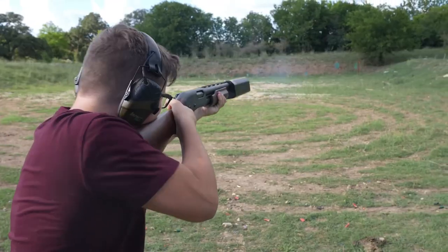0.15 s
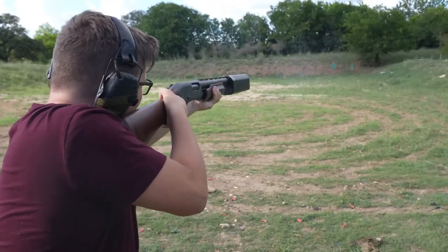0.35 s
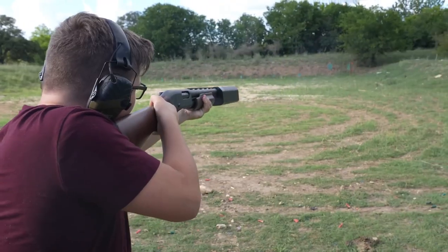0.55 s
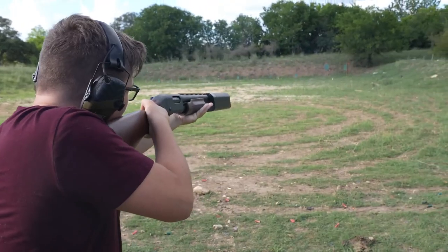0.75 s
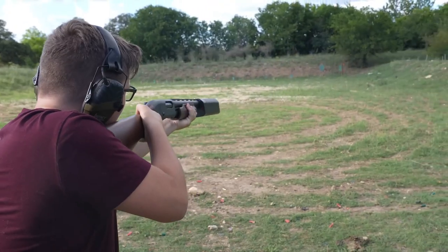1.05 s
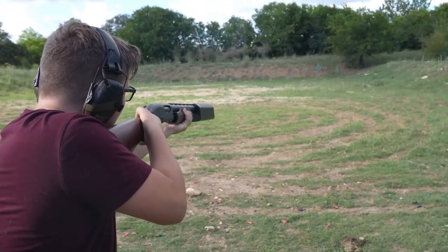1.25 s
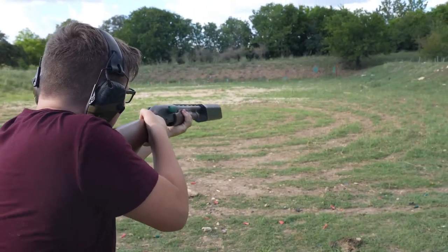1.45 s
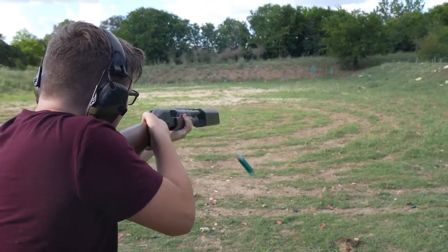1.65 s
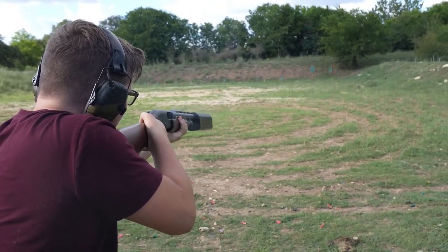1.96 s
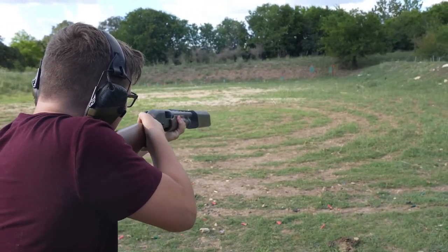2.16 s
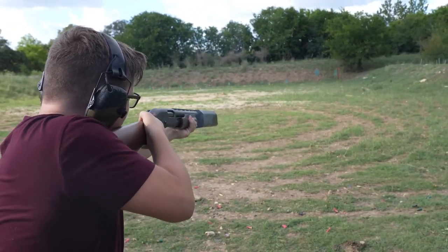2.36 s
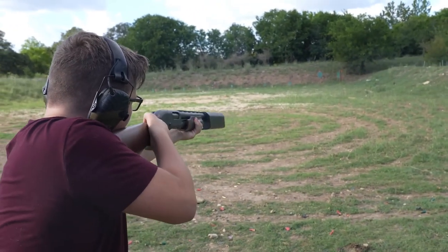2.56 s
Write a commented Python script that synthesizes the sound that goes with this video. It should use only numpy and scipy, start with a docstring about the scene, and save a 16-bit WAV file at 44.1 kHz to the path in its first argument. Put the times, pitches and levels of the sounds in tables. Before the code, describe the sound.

A suppressed shotgun fires once with a short spit, and a hissing echo rolls off the field and trees. Then the pump clacks back and slams shut, close to the microphone, over faint wind and insects.

```python
"""A suppressed pump shotgun fires once on a grassy range, heard from just behind the shooter.
Gas spits from the muzzle. The field scatters the shot back as a long hiss, and the bank and trees echo.
Then the pump is pulled back and slammed shut, and its steel parts clack, scrape and ring.
Underneath are light wind on the microphone, a faint steady hiss and insects in the grass."""
import sys
import numpy as np
from scipy import signal
from scipy.fft import rfft, irfft, next_fast_len
from scipy.io import wavfile
from scipy.ndimage import map_coordinates

SR = 44100
rng = np.random.default_rng(int(sys.argv[2]) if len(sys.argv) > 2 else 0)


def to_wav(s):
    """Save 16-bit WAV."""
    ch = np.atleast_2d(s).T  # columns
    pcm = np.round(np.clip(ch, -1, 1) * 32767)  # PCM
    wavfile.write(sys.argv[1], SR, pcm.astype(np.int16))


N = 119070
TIME_S = np.arange(N) / SR
LEFT_RIGHT = np.array([[1], [-1]])


def amp(db):
    """Turn decibels into a gain."""
    return 10 ** (np.asarray(db) / 20)


def unit(x):
    """Scale x to an average power of 1."""
    return x / np.sqrt(np.mean(x ** 2) + 1e-20)


def along(points, hz):
    """Read between (pitch_hz, value) points on a log pitch scale."""
    pitches, values = np.transpose(points)
    return np.interp(np.log(hz + 1), np.log(pitches + 1), values)


def tone(points):
    """Turn (pitch_hz, level_db) points into a gain curve."""
    return lambda hz: amp(along(points, hz))


def filtered(x, response):
    """Multiply each frequency in x by response(hz)."""
    size = next_fast_len(N + SR // 4)
    return irfft(rfft(x, size) * response(np.fft.rfftfreq(size, 1 / SR)), size)[..., :N]


def panned(db):
    """Left and right gains, with the left louder by db."""
    return unit(amp(LEFT_RIGHT * db / 2))


def aside(x, db, corner_hz=600):
    """Move a sound to one side; its bass stays in the middle."""
    return filtered(x, lambda hz: amp(LEFT_RIGHT * db / 2 * hz ** 2 / (hz ** 2 + corner_hz ** 2)))


def noise(colour, alike):
    """Stereo noise shaped by a gain curve. alike lists (pitch_hz, likeness); 1 makes both sides equal."""
    def response(hz):
        angle = np.arccos(np.clip(along(alike, hz), -1, 1)) / 2
        return colour(hz) * np.array([np.cos(angle), np.sin(angle)])
    mid, side = filtered(rng.standard_normal((2, N)), response)
    return unit(np.array([mid + side, mid - side]))


def split(x, edges, order=12):
    """Cut x into neighbouring pitch bands of equal power."""
    def band(low, high):
        return lambda hz: ((1 + (low / (hz + 1)) ** order) * (1 + (hz / high) ** order)) ** -.5
    return np.array([unit(filtered(x, band(low, high))) for low, high in zip(edges, edges[1:])])


def wobble(per_s):
    """A smooth curve through per_s random values a second."""
    return map_coordinates(rng.standard_normal(8192), [TIME_S * per_s], mode='wrap')


def fading(x, fades, start_s):
    """Fade each pitch at its own speed. In all tables, fade_s is the time to fall by 60 dB."""
    hz, t, spectrum = signal.stft(x, SR, nperseg=256)
    gain = amp(-60 * np.maximum(t - start_s, 0) / along(fades, hz)[:, None])
    return signal.istft(spectrum * gain, SR, nperseg=256)[1][:, :N]


# Borders of a burst's low, mid, high and top bands: edge_hz
BURST_EDGES = [150, 1400, 3200, 7500, 16000]
def bursts(rows, source, attack_s, fade_s, ring_db, ring_fade_s):
    """Each row sets off a quick burst of the source noise and a weaker, longer ring."""
    t = np.arange(SR // 3) / SR
    onset = (1 - np.exp(-t / attack_s)) ** 2
    shape = onset * (amp(-60 * t / fade_s) ** 2 + amp(ring_db - 60 * t / ring_fade_s) ** 2)
    power = np.zeros((len(BURST_EDGES) - 1, N + SR))
    for start_s, *levels_db in rows:
        first = round(start_s * SR)
        power[:, first:first + len(t)] += amp(levels_db)[:, None] ** 2 * shape
    return (np.sqrt(power[:, None, :N]) * split(source, BURST_EDGES)).sum(0)


# Strength of the gusts: time_s, level_db
GUSTS = [(0.0, -58.5), (0.09, -73), (0.16, -54.5), (0.27, -65), (0.29, -59.5), (0.96, -65.5), (1.22, -61),
         (1.28, -68), (1.58, -66), (1.72, -83), (1.81, -65), (1.905, -58.5), (1.96, -72.5), (2.18, -51.5),
         (2.3, -76), (2.43, -61), (2.59, -68), (2.618, -52), (2.7, -77)]
# Tone of the wind's deep rumble and of its higher flapping: pitch_hz, level_db
RUMBLE_TONE = [(20, -8), (50, 8), (80, 2.5), (130, -5.5), (200, -24), (300, -19), (500, -61), (1100, -100)]
FLAP_TONE = [(60, -12), (150, -4), (300, -5.5), (500, -19), (1000, -52)]
def wind():
    """Wind rumbles on the microphone; stronger gusts reach higher in pitch."""
    gust_db = np.interp(TIME_S, *np.transpose(GUSTS)) + 3.4 * wobble(35.1)
    rumble = amp(gust_db) * noise(tone(RUMBLE_TONE), [(50, 1), (300, .53)])
    flap_db = -87 + 1.45 * (gust_db - gust_db.mean())
    return rumble + amp(flap_db) * noise(tone(FLAP_TONE), [(100, .62), (600, .97)])


# Tone of the steady hiss: pitch_hz, level_db
HISS_TONE = [(400, -27), (1300, -16), (2500, 0), (4500, -5.5), (6500, -1.5), (10500, -14.5), (12000, -22),
             (15500, -48)]
def hiss(level_db=-67.5):
    """A thin, steady hiss, louder on the right."""
    air = noise(tone(HISS_TONE), [(300, .207), (2500, .05), (10000, .067)])
    lean = [(600, -5), (2300, -16.5), (5000, -1), (10500, -18.5)]  # pitch_hz, left_minus_right_db
    return amp(level_db) * unit(filtered(air, lambda hz: amp(along(lean, hz) * LEFT_RIGHT / 2)))


# Loudness of the insects: time_s, level_db
INSECT_LEVELS = [(.2, -60.5), (.9, -65.5), (1.35, -65), (1.9, -63)]
# Their tone: pitch_hz, level_db
INSECT_TONE = [(9300, -19), (10200, -12), (10700, -1), (11200, -11.5), (11900, -48)]
def insects():
    """Insects in the grass make a thin, high buzz, weaker after the shot."""
    level_db = np.interp(TIME_S, *np.transpose(INSECT_LEVELS))
    buzz = noise(lambda hz: tone(INSECT_TONE)(hz) * (abs(hz - 10600) < 1400), [(10000, .07)])
    return amp(level_db + .5 * wobble(11)) * buzz * panned(-.68)


# Tone of the slowest echo: pitch_hz, level_db
ROLL_TONE = [(120, -5), (300, 0.5), (550, -8), (900, 5.5), (1500, -9), (3000, -4.5), (8000, -18)]
def far_roll(level_db=-64, fade_s=11, rise_s=.5):
    """A faint, dull roll from the far side of the range lingers after the shot."""
    age_s = TIME_S - GAS_SPITS[0][0]
    loudness = amp(level_db - 60 * age_s / fade_s) * np.clip(age_s / rise_s, 0, 1)
    return loudness * noise(tone(ROLL_TONE), [(300, .86), (1500, .64)])


# Tone of the distant wood's echo: pitch_hz, level_db
WOOD_TONE = [(88, -42), (150, -11.5), (245, -10), (434, -30), (752, 1.5), (972, -4), (1650, -1.5),
             (2810, -5), (4600, -9.5), (5070, -10.5), (12300, -23), (15600, -56), (16500, -80)]
# How long it lasts: pitch_hz, fade_s
WOOD_FADES = [(300, 1.6), (1000, 1.87), (3000, 1.68), (8000, 1.5), (14000, 0.49)]
def far_wood(peak_s=.84, rise_s=.18, level_db=-47):
    """The last of the shot rolls away through the distant trees."""
    wash = noise(tone(WOOD_TONE), [(200, .93), (900, .6), (3000, .044)])
    swell = np.clip(1 + (TIME_S - peak_s) / rise_s, 0, 1)
    loudness = swell * amp(level_db + 1.1 * wobble(44.75))
    return fading(wash, WOOD_FADES, peak_s) * loudness * panned(-1.3)


# Soft echoes off field, bank and trees:
# peak_s, rise_s, fade_s, bass_db, low_mid_db, mid_db, high_db, top_db, lean_left_db
FIELD_ECHOES = [(.258, 0.028, 0.83, -58, -55, -45, -34, -26, 0.5),
                (0.296, 0.031, 0.21, -37, -38, -54, -31.5, -24.5, -1),
                (0.325, 0.028, 0.31, -39, -53, -33.5, -24, -26.5, -8),
                (0.388, 0.042, 1, -45, -49.5, -35, -26.5, -36.5, -6.5),
                (0.453, 0.032, 0.18, -65, -44, -25.5, -42, -34.5, -9),
                (0.482, 0.019, 0.14, -43.5, -45, -24.5, -31.5, -48, -6),
                (0.546, 0.044, 0.39, -52.5, -75, -36, -40.5, -59, -4),
                (0.556, 0.0059, 0.056, -42, -42, -35, -33, -48, -6),
                (0.61, 0.013, 0.33, -52.5, -46, -39.5, -32, -37.5, -6),
                (0.66, 0.064, 0.24, -55, -40.5, -34, -39, -70, -2),
                (0.763, 0.048, 0.2, -78, -48, -40.5, -45, -56, -2.5)]
# Borders of those five bands: edge_hz
ECHO_EDGES = [130, 550, 1400, 3200, 6500, 16000]
# Tone within the bands: pitch_hz, level_db
ECHO_TONE = [(59, -75), (100, -14), (193, -12.5), (277, -5.5), (315, -12.5), (373, -7.5), (415, -25),
             (752, 9), (991, 5), (1170, 5.5), (1360, -3), (2130, 3), (2420, -0.5), (2630, -1.5),
             (3780, -4.5), (5300, -4.5), (5770, -6.5), (10500, -1.5), (11600, -5), (15000, -5.5),
             (16000, -5)]
# How alike left and right are: pitch_hz, likeness
ECHO_LIKENESS = [(350, 1), (800, 0.81), (2000, 0.64), (10000, 0.039)]
def field_echoes(left_delay_s=.0001):
    """Grass and leaves scatter the shot; each stretch of ground or trees swells and dies away."""
    bands = split(noise(tone(ECHO_TONE), ECHO_LIKENESS), ECHO_EDGES)
    lean_scales = [.05, 2.3, 2.15, .16, 2.7]  # each band leans by its own multiple of lean_left_db
    power = 0
    for peak_s, rise_s, fade_s, *levels_db, lean_db in FIELD_ECHOES:
        age_s = TIME_S - peak_s
        swell = np.exp(-2 * (age_s / rise_s) ** 2)
        shape = np.where(age_s < 0, swell, amp(-60 * np.maximum(age_s, 0) / fade_s))
        gains = np.array([amp(db) * panned(lean_db * k) for db, k in zip(levels_db, lean_scales)])
        power += (gains * shape) ** 2
    flicker = amp(-.63 * wobble(900) + .2 * wobble(89))
    echo = (np.sqrt(power) * bands).sum(0) * flicker * (TIME_S > GAS_SPITS[0][0])
    # The trees stand to the right, so the left side hears them later.
    return filtered(echo, lambda hz: np.exp(-1j * np.pi * hz * left_delay_s * LEFT_RIGHT))


def uneven_ground(x):
    """Patchy ground and leaves make each pitch band of an echo swell and dip on its own."""
    hz, _, spectrum = signal.stft(x, SR, nperseg=512)
    blur = np.outer(np.hanning(9), np.hanning(9))
    patches = unit(signal.fftconvolve(rng.standard_normal(spectrum.shape[1:]), blur, 'same'))
    depth_db = along([(2500, 1.5), (8000, .45)], hz)[:, None]
    return signal.istft(spectrum * amp(depth_db * patches), SR, nperseg=512)[1][:, :N]


# Hollow echoes: peak_s, pitch_hz, level_db, half_length_s, left_minus_right_db
TREE_KNOCKS = [(0.32, 2100, -43, 0.0075, 15), (0.453, 720, -33.5, 0.0046, 2), (0.474, 1560, -32, 0.0045, 0),
               (0.556, 1190, -30, 0.0056, 1.5), (0.62, 1140, -29.5, 0.0053, -1),
               (0.63, 850, -25.5, 0.002, -0.5), (0.636, 1260, -29.5, 0.004, -5),
               (.771, 1190, -42.5, 0.0076, 3), (.881, 1750, -49, 0.0053, 1),
               (1.01, 740, -49.5, 0.0077, -0.5)]
def tree_knocks():
    """Single trees and the bank each send back a short swell around one pitch."""
    out = 0
    for peak_s, hz, db, half_s, lean_db in TREE_KNOCKS:
        swell = np.exp(-((TIME_S - peak_s) / half_s) ** 2 / 2)
        note = np.sin(2 * np.pi * hz * TIME_S + .66 * wobble(330))
        out += amp(db) * panned(lean_db) * swell * note
    return out


# The hard echo from down the range: start_s, low_db, mid_db, high_db, top_db
SLAP_ECHO = [(.514, -45, -26, -33, -50)]
# Tone within its bands: pitch_hz, level_db
SLAP_TONE = [(60, -40), (200, -8), (500, -16), (1100, 0), (2200, 5), (4000, -6), (15000, -20)]
def slap_echo(crack_s=.5146, crack_width_s=.0001):
    """One short, dull bang with a sharp front comes back from down the range."""
    air = noise(tone(SLAP_TONE), [(400, .47), (2000, .51), (8000, .223)])
    bang = bursts(SLAP_ECHO, air, attack_s=.0003, fade_s=.024, ring_db=-9, ring_fade_s=.045)
    age = np.maximum(np.arange(N) - round(crack_s * SR), 0) / SR / crack_width_s
    crack = amp(-10) * (1 - age) * np.exp(-age) * (age > 0)  # a push of air, then a weaker pull
    return aside(bang + crack, db=-3)


# How long sound hangs over the range: pitch_hz, fade_s
RANGE_FADES = [(200, 1), (900, 1.0), (3000, 1), (6000, 0.83), (14000, 0.68)]
def pump_echo(pump, level_db=-23, rise_s=.052):
    """The open range answers the pump with a faint, slow tail."""
    colour = tone([(200, 9.5), (900, -1.5), (3000, -3), (6000, 5.5), (14000, 2)])
    tail = fading(noise(colour, [(200, 1), (2000, .069)]), RANGE_FADES, 0)[:, :SR]
    tail *= 1 - np.exp(-TIME_S[:SR] / rise_s)
    tail /= np.linalg.norm(tail[0])
    return amp(level_db) * signal.fftconvolve(pump.mean(0)[None], tail, axes=1)[:, :N]


# Tinks of the shell and loose parts: start_s, pitch_hz, level_db, fade_s
LOOSE_PARTS = [(0.966, 4600, -36, .04), (1.6429, 2170, -32.5, 0.027), (1.7053, 1860, -38, 0.038),
               (1.7752, 5440, -40, 0.028), (1.809, 1930, -45.5, 0.07), (2.1243, 1260, -54.5, 0.059),
               (2.316, 4760, -23.5, 0.034), (2.3698, 1885, -19.5, 0.025)]
def tinks(attack_s=.00026, roughness=.95):
    """The shell and small parts ring briefly, each at one slightly unsteady pitch."""
    out = 0
    for start_s, hz, db, fade_s in LOOSE_PARTS:
        age_s = np.maximum(TIME_S - start_s, 0)
        loudness = amp(db - 60 * age_s / fade_s) * (1 - np.exp(-age_s / attack_s))
        out += loudness * np.sin(2 * np.pi * hz * age_s + roughness * wobble(520))
    return out * panned(-1.5)


# Pitches at which the gun's body and barrel ring: pitch_hz, base_width_hz, strength_db
STEEL_PEAKS = [(1852, 29, 13), (4273, 350, 1.5), (4580, 90, 1.5), (5480, 60, 6), (7120, 89, -12),
               (9640, 24, 8), (10700, 160, -15), (13200, 140, -9), (14100, 400, -9), (15100, 93, -15)]
# How alike left and right are: pitch_hz, likeness
STEEL_LIKENESS = [(300, 1), (1500, 0.95), (4000, 0.52), (12000, 0.31)]
def steel(bed, widen=1.8):
    """Noise with the gun's ringing peaks, dulled by the hands, over a dense bed of weaker ones."""
    def colour(hz):
        peaks = sum(amp(db - 5.5) / (1 + (2 * (hz - pitch) / (widen * width)) ** 2)
                    for pitch, width, db in STEEL_PEAKS)
        return amp(along(bed, hz)) + peaks
    return noise(colour, STEEL_LIKENESS)


# Parts hitting as the pump is gripped, pulled and shut: start_s, low_db, mid_db, high_db, top_db
PUMP_CLACKS = [(0.8466, -75, -80, -46, -48.5), (0.966, -68, -66, -35, -48), (0.977, -58, -50, -41, -54),
               (1.0328, -56.5, -75, -49, -56), (1.146, -79, -56, -56, -60), (1.1725, -73, -56, -47, -54),
               (1.178, -53.5, -46.5, -44, -46), (1.3707, -81, -58.5, -56.5, -54),
               (1.4325, -66, -59, -49, -67), (1.4585, -72, -41.5, -49.5, -55), (1.469, -46, -39, -47, -44),
               (1.476, -63, -40, -36, -31), (1.485, -75, -49, -37.5, -45), (1.5, -40, -37, -36.5, -46),
               (1.504, -66, -39.5, -40, -53), (1.5245, -51, -36, -25, -32), (1.527, -38, -26.5, -30, -30),
               (1.534, -33.5, -40, -26, -27), (1.5434, -27, -40, -18.5, -24.5),
               (1.5492, -35.5, -32, -22, -25), (1.561, -28.5, -42, -22, -20), (1.567, -35, -28, -30, -25),
               (1.59, -56, -43, -42, -46), (1.593, -38, -55, -56, -54), (1.6356, -54, -45, -38.5, -49),
               (1.6449, -53, -45.5, -42, -49), (1.6945, -55, -55, -40, -43.5), (1.7056, -53, -53, -60, -58),
               (1.713, -56, -53, -48.5, -48), (1.775, -53.5, -46, -45.5, -47),
               (1.807, -71, -58, -45.5, -56), (1.829, -56, -57, -48, -56), (2.1251, -70, -65, -58.5, -48),
               (2.256, -89, -55.5, -40, -55), (2.2778, -64, -53, -29, -41), (2.2839, -55, -55, -30, -32),
               (2.299, -44.5, -41.5, -34.5, -39), (2.3165, -45, -49, -23.5, -26.5),
               (2.3228, -40, -39, -25, -24.5), (2.33, -60, -38, -42, -35), (2.344, -48, -43, -25.5, -33),
               (2.3448, -48, -48, -26, -36), (2.364, -38, -34, -30, -36), (2.371, -39.5, -31.5, -30.5, -39),
               (2.379, -49, -38, -33, -42), (2.3884, -37, -26.5, -26, -35), (2.4039, -41, -28, -40, -53),
               (2.4125, -33.5, -21, -17, -20), (2.416, -30.5, -27, -15.5, -20),
               (2.4239, -29, -32, -17.5, -20), (2.4772, -39, -45, -60, -55)]
# The pump grip sliding: start_s, end_s, level_db
PUMP_SLIDES = [(1.412, 1.467, -58), (1.476, 1.595, -44), (2.327, 2.44, -40)]
# Bed of weak ringing while the gun opens and while it shuts: pitch_hz, level_db
OPENING_TONE = [(100, -38), (250, -28), (480, -19.5), (640, -15.5), (780, 5), (980, -14), (1200, -2.5),
                (1500, -2.5), (2600, 2), (4200, -1), (10000, -2.5), (16000, -7)]
CLOSING_TONE = [(100, -47), (250, -16), (450, -19), (660, -2), (800, 1.5), (980, -9.5), (1300, -3.5),
                (1550, -1.5), (2600, 3), (4200, -3), (10000, -0.5), (16000, -6)]
def pump_action(turn_s=2):
    """Bolt, bars and shell knock and scrape inside the gun, going back and, after turn_s, forward."""
    sliding = sum(amp(db) * np.clip(np.minimum(TIME_S - start_s, end_s - TIME_S) / .016, 0, 1)
                  for start_s, end_s, db in PUMP_SLIDES)
    sliding *= amp(2 * wobble(560))
    back = bursts([row for row in PUMP_CLACKS if row[0] < turn_s], steel(OPENING_TONE),
                  attack_s=.00047, fade_s=.019, ring_db=-13.5, ring_fade_s=.13)
    forward = bursts([row for row in PUMP_CLACKS if row[0] >= turn_s], steel(CLOSING_TONE),
                     attack_s=.0006, fade_s=.016, ring_db=-17, ring_fade_s=.12)
    scrape = sliding * np.where(TIME_S < turn_s, steel(OPENING_TONE), steel(CLOSING_TONE))
    rattle = amp(2.2 * wobble(1500))
    return (amp(3) * back * rattle + scrape) * panned(-1.4) + amp(3.5) * forward * rattle * panned(-1.3)


# Puffs of gas that make the shot: start_s, low_db, mid_db, high_db, top_db
GAS_SPITS = [(0.2221, -36, -27.5, -28, -23.5), (0.227, -37, -38, -19, -20.5),
             (0.2302, -57, -48, -31.5, -16.5)]
def muzzle():
    """Gas leaves the suppressor in a few sharp spits."""
    colour = tone([(100, 20), (500, 13.5), (2500, 10.5), (7000, .5), (10500, 5.5), (15000, -3.5)])
    gas = noise(colour, [(400, .88), (2000, .88), (8000, .28)])
    spits = bursts(GAS_SPITS, gas, attack_s=.00086, fade_s=.016, ring_db=-18, ring_fade_s=.17)
    return amp(4) * aside(spits, db=-6)


def scene():
    """The shot, its echoes, then the pump, over wind, hiss and insects."""
    pump = pump_action() + tinks()
    echoes = slap_echo() + tree_knocks() + uneven_ground(field_echoes() + far_wood() + far_roll())
    return muzzle() + echoes + pump + pump_echo(pump) + wind() + hiss() + insects()


def record(dry, top_hz=15950, edge_hz=90):
    """Cut away the very highest treble, steeply but smoothly."""
    return filtered(dry, lambda hz: .5 - .5 * np.tanh((hz - top_hz) / edge_hz))


dry = scene()
out = record(dry)
to_wav(out)
```